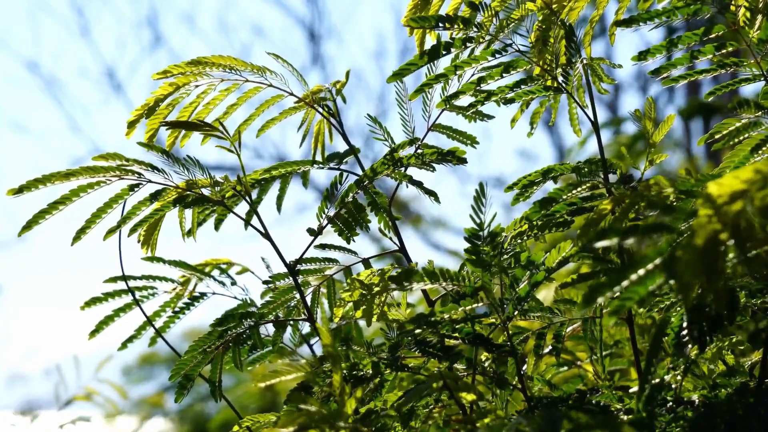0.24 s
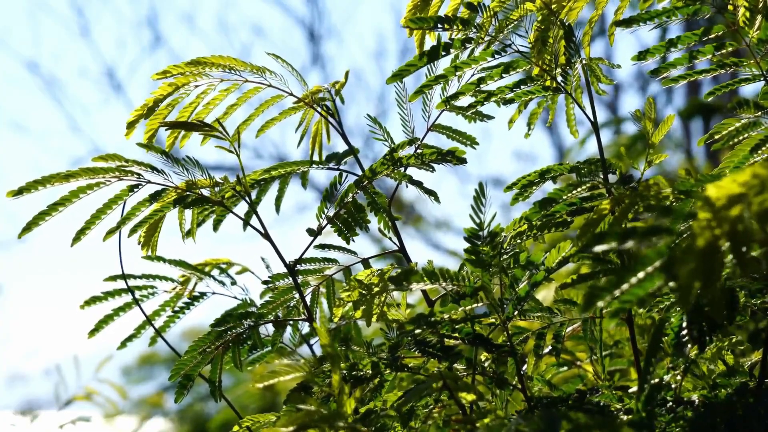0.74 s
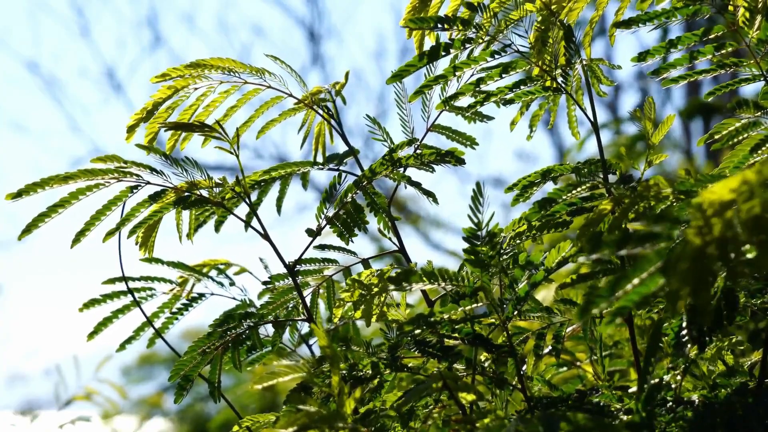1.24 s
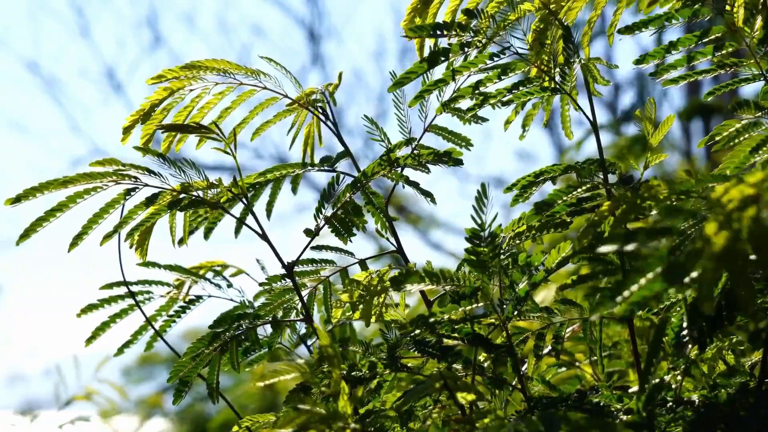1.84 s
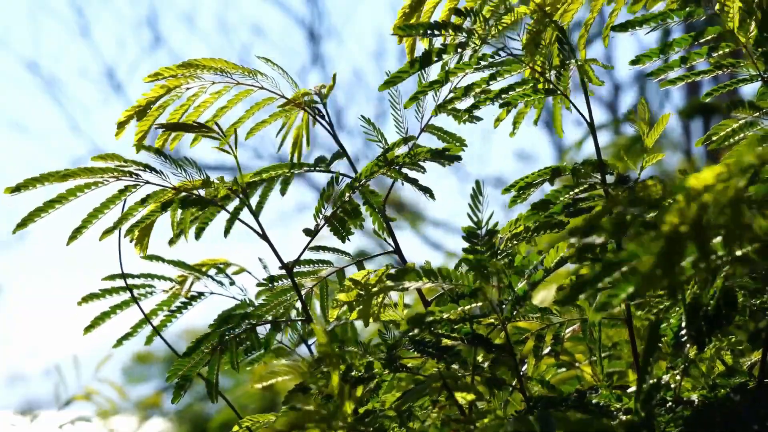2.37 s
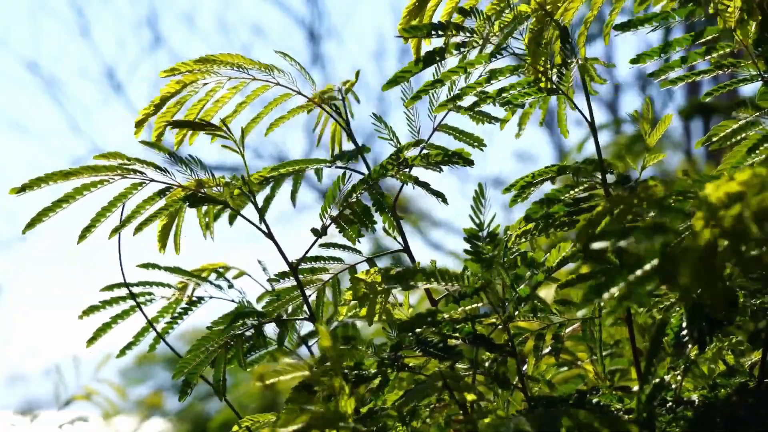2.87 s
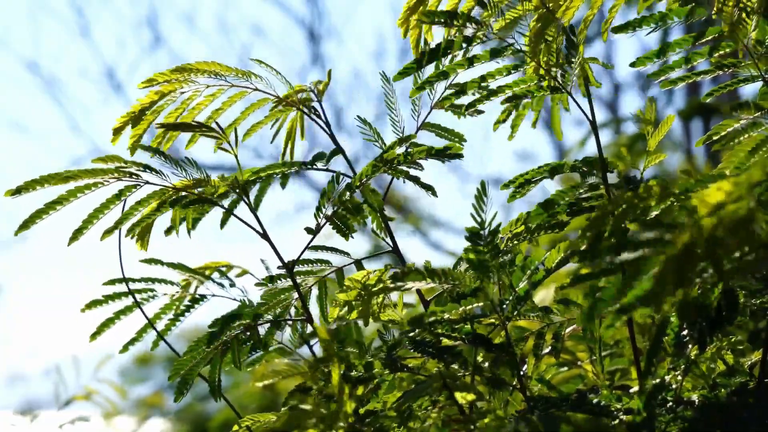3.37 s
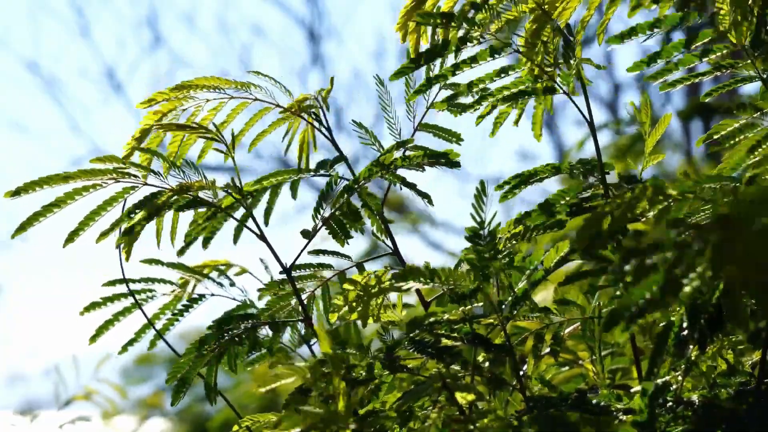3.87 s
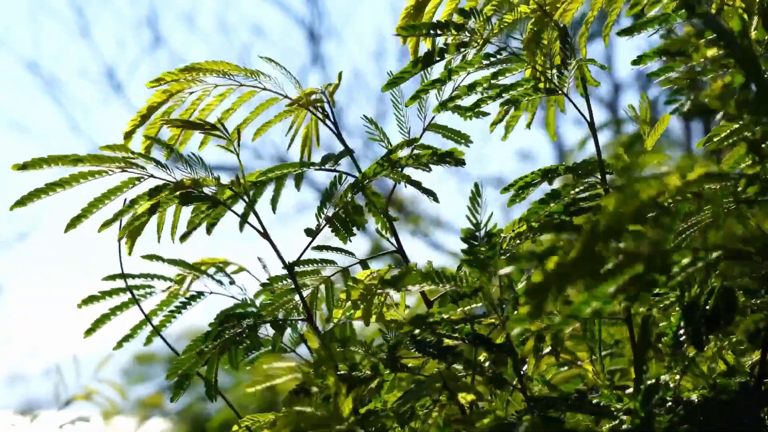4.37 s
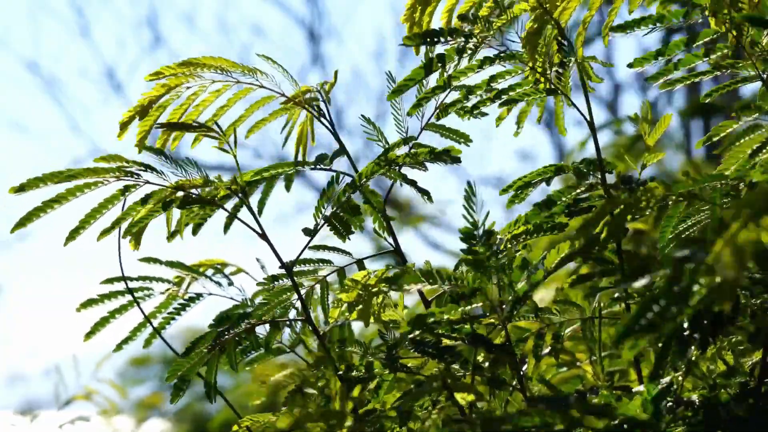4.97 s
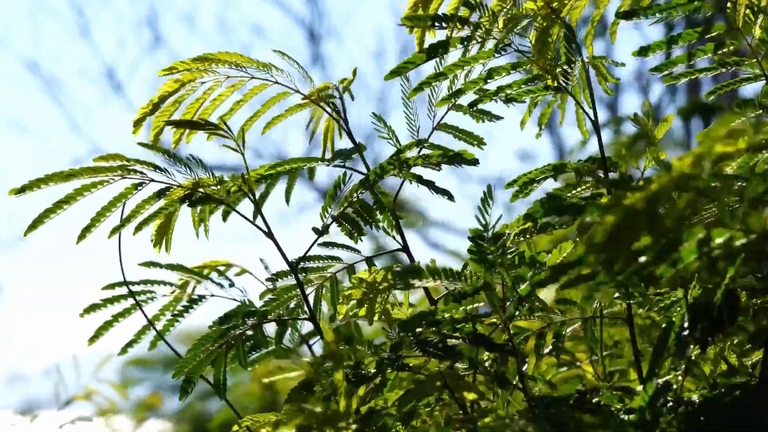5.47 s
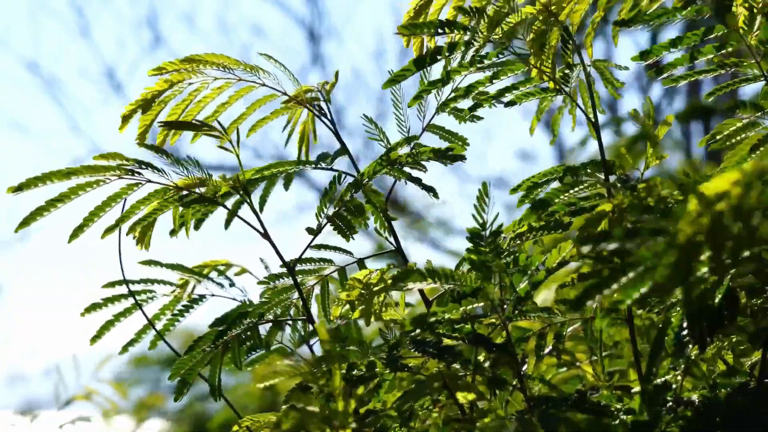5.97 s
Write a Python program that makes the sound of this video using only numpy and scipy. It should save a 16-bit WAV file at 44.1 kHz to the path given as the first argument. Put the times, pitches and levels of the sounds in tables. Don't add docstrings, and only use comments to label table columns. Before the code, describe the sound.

Wind stirs fine leaves from a soft rustle to a brisk ticking hiss, with low buffeting, a throbbing cicada, brief bird whistles and light twig knocks.

```python
import sys
import numpy as np
from scipy import signal
from scipy.fft import rfft, irfft, next_fast_len
from scipy.io import wavfile
from scipy.ndimage import uniform_filter1d

SR = 44100
rng = np.random.default_rng(int(sys.argv[2]) if len(sys.argv) > 2 else 0)


def generate_wav(signal):
    frames = np.transpose(np.atleast_2d(signal))
    scaled = np.clip(frames, -1, 1) * 32767
    pcm = np.round(scaled).astype(np.int16)
    wavfile.write(sys.argv[1], SR, pcm)


def undo_db(level):
    steps = np.asarray(level, float) / 20
    return 10 ** steps


N = 273861


def in_time(rows, **ends):
    s, *columns = np.transpose(rows)
    return [np.interp(np.arange(N) / SR, s, c, **ends) for c in columns]


def at_hz(points, hz):
    point_hz, point_db = np.transpose(points)
    return np.interp(np.log(hz + 1e-3), np.log(point_hz), point_db)


def rms_one(x):
    return x / np.sqrt(np.mean(x ** 2) + 1e-20)


def drift(rate):
    step = 40
    r = np.exp(-2 * np.pi * step * rate / SR)
    noise = rng.standard_normal(N // step + 2002)
    slow = signal.lfilter([1], [1, -2 * r, r * r], noise)[2000:]
    return np.interp(np.arange(N) / step, np.arange(len(slow)), rms_one(slow))


def resonance(x, hz, width_hz):
    r = np.exp(-np.pi * width_hz / SR)
    w = 2 * np.pi * min(hz, 0.45 * SR) / SR
    top = np.array([1, 0, -1]) * (1 - r * r) / 2
    return signal.lfilter(top, [1, -2 * r * np.cos(w), r * r], x + 1e-18)


def coloured(centre, spectrum, shared_db, own_db, own_rate):
    # (frequency [Hz], level [dB])
    side_width = [(60, -54), (130, -44), (270, -28.5), (500, -23), (750, -19), (1300, -10.5), (2200, -5),
                  (3300, 0), (5000, -4.5), (7000, -5.5), (9000, -9), (15000, -35)]
    size = next_fast_len(N)
    hz = np.arange(size // 2 + 1) * SR / size
    mid = rfft(centre, size) * undo_db(at_hz(spectrum, hz))
    side = rfft(rng.standard_normal(N), size) * undo_db(at_hz(spectrum, hz) + at_hz(side_width, hz))
    together = shared_db * drift(5.3)
    lowest_hz = spectrum[0][0]
    place = 1.5 * np.log2(np.clip(hz, lowest_hz, None) / lowest_hz)
    m = 0
    for k in range(int(place[-1]) + 2):
        share = np.clip(1 - np.abs(place - k), 0, 1)
        patch = irfft(mid * share, size)[:N]
        m = m + undo_db(together + own_db * drift(own_rate)) * patch
    s = undo_db(together) * irfft(side, size)[:N]
    return rms_one(np.array([m + s, m - s]))


def snaps(events, ms, breadth, trim_db):
    age = np.arange(int(ms * SR / 125)) / SR
    out = np.zeros(N + len(age))
    for s, peak_db, hz in events:
        puff = np.resize(rng.standard_normal(2048), len(age)) * np.exp(-age * 1000 / ms)
        body = resonance(puff, hz, breadth * hz)
        out[round(s * SR):][:len(age)] += undo_db(peak_db + trim_db) * body / np.abs(body).max()
    return out[:N]


def scattered(x, tail_s):
    age = np.arange(6000) / SR
    tail = rng.standard_normal((2, 6000)) * np.exp(-age / tail_s)
    tail /= np.sqrt(np.sum(tail ** 2, axis=1, keepdims=True))
    return signal.fftconvolve(x[None], tail, axes=1)[:, :N]


def whistle(rows, wobble):
    hz, level_db = in_time(rows)
    t = np.arange(N) / SR
    inside = np.clip(np.minimum(t - rows[0][0], rows[-1][0] - t) / 0.0013, 0, 1)
    phase = 2 * np.pi * np.cumsum(hz * (1 + wobble)) / SR
    return np.sqrt(2) * inside * undo_db(level_db) * np.sin(phase)


def leaves(hiss_db):
    # (frequency [Hz], level [dB per Hz])
    leaf_colour = [(500, -20), (1500, -2.5), (2900, -11), (4100, -9), (6100, -4), (8600, -5), (10500, -1.5),
                   (12200, -0.5), (13800, -4), (15300, -9.5)]
    contacts_per_s, spread_db, scuff_ms = 350, -0.5, 1.6
    breadth, grain_share = 0.27, 0.16
    sizes = undo_db(spread_db * np.minimum(rng.exponential(1, N), 3.0))
    busy = contacts_per_s * undo_db(0.5 * (hiss_db - np.mean(hiss_db)) + 6.5 * drift(16))
    touches = sizes * (rng.random(N) < busy / SR)
    touches /= np.sqrt(uniform_filter1d(touches ** 2, size=7000) + 1e-3)
    pitches_hz = np.geomspace(2500, 14500, 9)
    leaf = rng.integers(0, 9, N)
    fade = np.exp(-1000 / scuff_ms / SR)
    rubbing = rng.standard_normal(N)
    grains = 0
    for k, hz in enumerate(pitches_hz):
        scuffs = rubbing * signal.lfilter([1], [1, -fade], touches * (leaf == k) + 1e-18)
        once = resonance(scuffs, hz, breadth * hz)
        grains = grains + resonance(once, hz, breadth * hz)
    hiss = rng.standard_normal(N)
    source = np.sqrt(grain_share) * rms_one(grains) + np.sqrt(1 - grain_share) * hiss
    return undo_db(hiss_db + 3.0) * coloured(source, leaf_colour, shared_db=0.1, own_db=1.83, own_rate=19)


def eddies(slow_db, quick_db):
    # (frequency [Hz], level [dB per Hz])
    slow_eddies = [(1, -10.5), (4, 1.5), (7, -5), (12, 0.5), (15, -12), (18, -3), (24, -19)]
    # (frequency [Hz], level [dB per Hz])
    quick_eddies = [(12, -14), (18, 0), (25, -1), (33, -7), (44, -12), (60, -16), (85, -22), (150, -32)]
    kinds = ((slow_eddies, slow_db, 16, -60), (quick_eddies, quick_db, 80, -52))
    hz = np.arange(N // 2 + 1) * SR / N
    out = 0
    for spectrum, level_db, top_hz, apart_db in kinds:
        shape = undo_db(at_hz(spectrum, hz)) * (hz < spectrum[-1][0]) * (hz > 2)
        lumps, other = rms_one(irfft(rfft(rng.standard_normal((2, N))) * shape, N))
        envelope = np.abs(signal.hilbert(lumps, next_fast_len(N))[:N])
        steady = lumps / (envelope + 0.22)
        size = uniform_filter1d(undo_db(level_db + 6.5), size=5000)
        push = size * (steady + undo_db(apart_db) * other * [[1], [-1]])
        out = out + signal.sosfilt(signal.butter(2, top_hz, fs=SR, output="sos"), push)
    return signal.lfilter([1, -1], [1, -np.exp(-5 * np.pi / SR)], out)


def far_wash(slow_db):
    # (frequency [Hz], level [dB per Hz])
    far_colour = [(40, -3), (60, -6), (135, -7.5), (210, -7.5), (430, -10.5), (980, -14), (1450, -18),
                  (2300, -21), (3100, -25.5), (4200, -24), (7000, -26), (12000, -33), (15500, -54)]
    follows, rise_db_per_s = 0.02, 0.16
    from_middle_s = (np.arange(N) - N / 2) / SR
    far_db = -49.5 + follows * (slow_db + 35) + rise_db_per_s * from_middle_s
    noise = rng.standard_normal(N)
    return undo_db(far_db + 4.5) * coloured(noise, far_colour, shared_db=0.33, own_db=0.7, own_rate=3.9)


def bee():
    # (time [s], wing beat [Hz], level [dB])
    flight = [
        (0.0, 212, -37.5),
        (0.05, 208, -85),
        (0.16, 210, -49.5),
        (0.25, 203, -71),
        (0.3, 205, -54),
        (0.814, 207, -55),
        (1.1, 209, -60.5),
        (1.7, 200, -57),
    ]
    return whistle(flight, 0.0254 * drift(2.64))


def phrase():
    # (time [s], length [s], first pitch [Hz], last pitch [Hz], level [dB])
    glides = [
        (0.023, 0.066, 6040, 4780, -50.5),
        (0.081, .036, 4960, 5350, -48),
        (.144, .016, 6300, 6500, -46),
        (.17, .028, 6300, 5700, -53),
        (0.356, .055, 7150, 5400, -54),
        (0.463, .084, 6350, 5000, -52.5),
        (0.607, 0.027, 5100, 5250, -52),
    ]
    attack_s, release_s, edge_db = 0.012, 0.009, -11
    sung = []
    for s, length, first, last, db in glides:
        swell_end = min(attack_s, length / 2)
        fade_start = max(length - release_s, length / 2)
        times = np.array([0, swell_end, fade_start, length])
        pitch_hz = first + (last - first) * times / length
        level_db = db + edge_db * np.array([1, 0, 0, 1])
        sung.append(np.transpose([s + times, pitch_hz, level_db]))
    first_top_s, gap_s, top_db, foot_db = 0.213, 0.027, -52, -57
    for k in range(3):
        top, hz = first_top_s + k * gap_s, 6700 + 120 * k
        sung.append([(top - gap_s / 2, hz - 453, foot_db), (top, hz, top_db),
                     (top + gap_s / 2, hz - 620, foot_db)])
    return sung


def bird():
    # (time [s], pitch [Hz], level [dB])
    far_call = [
        (5.48, 2209, -61),
        (5.5, 2209, -58),
        (5.65, 2208, -59),
        (5.67, 2208, -65),
    ]
    wobble = 0.002 * drift(80)
    song = sum(whistle(note, wobble) for note in phrase()) + whistle(far_call, 0)
    late = np.interp(np.arange(N) - 1.0, np.arange(N), song)
    return np.array([song, late]) + 0.28 * scattered(song, tail_s=0.05)


def twigs():
    # (time [s], peak level [dB], centre [Hz])
    knocks = [(0.1446, -28, 3860), (3.244, -48, 2340), (3.8217, -38, 1810), (3.8836, -29.5, 1640),
              (3.9125, -44, 1480), (4.0906, -32.5, 1740), (4.125, -43, 2030), (4.6668, -43, 1840),
              (4.7375, -27.5, 2000), (4.8513, -27.5, 1600), (4.931, -19.5, 3470), (5.0207, -27.5, 2050),
              (5.0848, -32, 1630), (5.1944, -27, 1810), (5.7743, -30, 1970), (5.9858, -29.5, 1800),
              (6.0673, -28, 1790)]
    return snaps(knocks, ms=1.3, breadth=2.6, trim_db=-1.5)


def clear_ticks():
    # (time [s], peak level [dB], centre [Hz])
    flicks = [(0.146, -29, 11000), (0.471, -26, 7660), (0.5452, -27, 12500), (0.6903, -28, 10100),
              (0.8077, -29, 11700), (1.2067, -24, 11200), (1.3292, -26, 7000), (2.1994, -31, 11000),
              (2.5633, -18, 10700), (2.9078, -26, 10600), (3.037, -27, 10900), (3.2959, -22, 12700),
              (3.3832, -21, 11000), (3.454, -20, 10400), (3.5074, -24, 12100), (3.5329, -24.5, 11100),
              (3.8846, -19.5, 11900), (4.0347, -21.5, 12940), (4.5835, -25, 7180), (4.6598, -25, 10700),
              (4.8229, -27, 11300), (5.023, -21, 11600), (5.2071, -20.5, 10700), (5.457, -20, 11000),
              (5.7324, -20.5, 11400), (5.8512, -21, 12000), (5.9444, -24, 6630), (6.107, -20, 12000),
              (6.1519, -25, 11700), (6.1669, -16.5, 10900)]
    return snaps(flicks, ms=1.73, breadth=0.23, trim_db=-8.0)


def faint_ticks(hiss_db):
    count, over_hiss_db, spread_db = 110, 14, 3.5
    centre_hz, hz_spread = 11000, 0.23
    s = np.sort(rng.random(count)) * (N - 1) / SR
    size, colour = rng.standard_normal((count, 2)).T
    peak_db = hiss_db[(s * SR).astype(int)] + over_hiss_db + spread_db * np.minimum(size, 1)
    hz = centre_hz * np.exp(-np.abs(hz_spread * colour) * 2 + hz_spread)
    return snaps(zip(s, peak_db, hz), ms=0.73, breadth=0.43, trim_db=-1.5)


def metal_rods():
    # (time [s], frequency [Hz], peak level [dB], decay by 60 dB [s], left lead [rad])
    modes = [(2.283, 8060, -45, .12, .3), (5.025, 4762, -58, .9, 2.4), (5.025, 4850, -60, .9, 2.2),
             (5.48, 5130, -45, .35, 1.9), (5.48, 5765, -49, .4, 1.5), (.4, 2490, -64, 5, 0.73),
             (5.545, 4762, -51, 1.1, 2.5), (5.545, 4800, -62, .8, 2.2), (6.0, 5770, -42, 0.46, 1.0),
             (5.47, 12200, -50, .3, 2.4), (5.5, 10600, -60, .3, 2.4), (5.52, 13600, -53, .3, 2.4),
             (6.0, 12000, -55, .25, 2.4), (6.0, 13700, -55, .2, 2.4), (6.012, 4760, -47, 0.71, 2.0),
             (6.012, 4900, -58, .7, 2.0)]
    out, t = np.zeros((2, N)), np.arange(N) / SR
    for s, hz, peak_db, t60, lead in modes:
        age = np.maximum(t - s, 0)
        fade = undo_db(peak_db - 60 * age / t60) * np.minimum(age / 0.002, 1)
        out += fade * np.sin(2 * np.pi * hz * age + np.array([[lead / 2], [-lead / 2]]))
    return out


def throbs():
    # (start time [s], length [s], level [dB])
    known = [(.6, .075, -61), (.752, .085, -59), (.921, 0.13, -55.5), (1.294, .118, -53.5),
             (2.331, .128, -49), (2.506, .105, -48), (3.016, 0.14, -48.5), (3.184, 0.098, -47.5),
             (3.355, .082, -46.5), (3.508, .11, -47), (3.679, .087, -46.5), (4.181, .11, -47),
             (4.359, 0.096, -46.5), (4.692, 0.084, -45.5), (5.347, .11, -47), (6.007, 0.13, -46.5),
             (6.194, .1, -51)]
    number = [0, 1, 2, 4, 10, 11, 14, 15, 16, 17, 18, 21, 22, 24, 28, 32, 33]
    count = np.arange(number[-1] + 1)
    return np.transpose([np.interp(count, number, c) for c in np.transpose(known)])


def cicada():
    # (frequency [Hz], width [Hz], level [dB])
    body_modes = [(5052, 78, -0.5), (4615, 55, -0.5), (4910, 97, -24), (5510, 74, -2.5), (5260, 1100, -12),
                  (4370, 140, -10.5)]
    clicks_hz, jitter, recruit, scatter = 236, 0.02, 0.69, 0.25
    t, gate, rows = np.arange(N) / SR, np.zeros(N), throbs()
    for s, length, level_db in rows:
        rise = (t - s) / 0.011 + 0.5
        fall = (s + length - t) / 0.033 + 0.5
        gate += undo_db(level_db - 2.0) * np.clip(np.minimum(rise, fall), 0, 1)
    effort_db = in_time(rows)[1] + 48
    turns = np.cumsum(clicks_hz * (1 + jitter * drift(60))) / SR
    second_rib = 0.83 * np.floor(turns + 0.17 + 0.03 * drift(90))
    ribs = np.diff(np.floor(turns) + second_rib, prepend=0)
    crackle = rng.standard_normal(N) * np.exp(-(turns % 1) / 0.56)
    source = rms_one(ribs * undo_db(0.88 * rng.standard_normal(N))) + 0.81 * rms_one(crackle)
    ringing = []
    for k, (hz, width_hz, db) in enumerate(body_modes):
        ringing.append(undo_db(db) * resonance(source, hz, width_hz) * (-1) ** k)
    song = rms_one(ringing[0] + undo_db(recruit * effort_db) * sum(ringing[1:]))
    song *= gate / np.sqrt(uniform_filter1d(song ** 2, size=600))
    return np.array([song, song]) + scatter * scattered(song, tail_s=0.073)


def fly():
    # (time [s], wing beat [Hz], level [dB])
    flight = [
        (0.9, 241, -65),
        (1.0, 248, -58),
        (1.09, 247, -51.5),
        (1.16, 240.4, -66),
        (1.3, 239.8, -52),
    ]
    return whistle(flight, 0.011 * drift(9.8))


def thumps():
    # (time [s], peak level [dB], centre [Hz])
    bursts = [
        (1.46, -52, 68.5),
        (2.57, -44, 152),
        (2.71, -47, 120),
        (2.89, -40, 109.6),
        (2.97, -45, 150),
        (3.09, -44.5, 145),
        (3.766, -35.5, 171),
        (3.89, -48, 70),
        (4.01, -51, 150),
        (4.134, -33.5, 122),
    ]
    return snaps(bursts, ms=25, breadth=0.55, trim_db=1.5) * undo_db(np.array([[-9.0], [3.0]]))


def scene():
    # (time [s], strength [dB])
    gust = [(0.0, -29), (.25, -36.5), (.85, -48.5), (1.4, -44), (1.7, -39), (2.0, -31.5), (2.2, -35),
            (2.4, -19), (2.65, -31.5), (3.15, -23.5), (3.6, -16), (4.0, -16), (4.4, -22), (4.85, -27.5),
            (5.4, -17), (5.74, -26.5), (6.12, -17.5), (6.21, -30)]
    # (time [s], strength [dB])
    crown = [(0.0, -50), (.3, -51.5), (.86, -55), (1.5, -56), (2.0, -57.5), (2.4, -55), (2.7, -53.5),
             (3.3, -48.5), (4.3, -49.5), (5.2, -49), (6.21, -47.5)]
    slow_db, hiss_db = in_time(gust)[0], in_time(crown)[0]
    quick_db = -43.5 + 0.37 * (slow_db + 35)
    tree = leaves(hiss_db) + twigs() + clear_ticks() + faint_ticks(hiss_db)
    air = eddies(slow_db, quick_db) + thumps() + far_wash(slow_db)
    animals = bee() + fly() + bird() + cicada()
    return tree + air + animals + metal_rods()


def band_limit(x):
    return signal.sosfilt(signal.butter(12, 15670, fs=SR, output="sos"), x)


def record(dry):
    low_pass = signal.ellip(14, 0.3, 80, 15200, fs=SR, output="sos")
    cut = signal.sosfilt(low_pass, dry)
    return band_limit(cut)


dry = scene()
out = record(dry)
generate_wav(out)
```